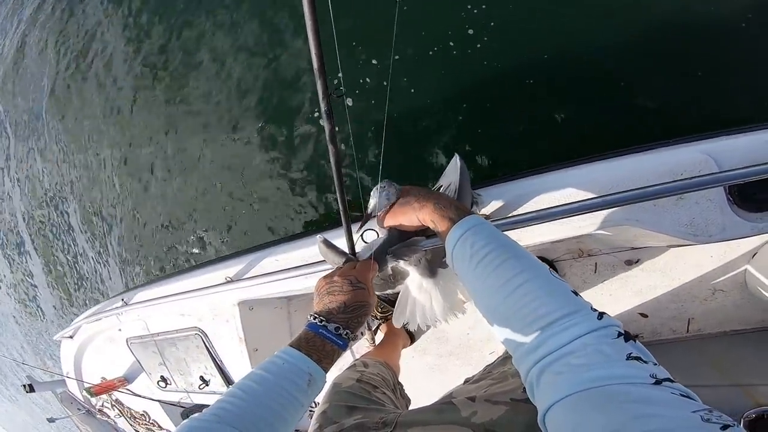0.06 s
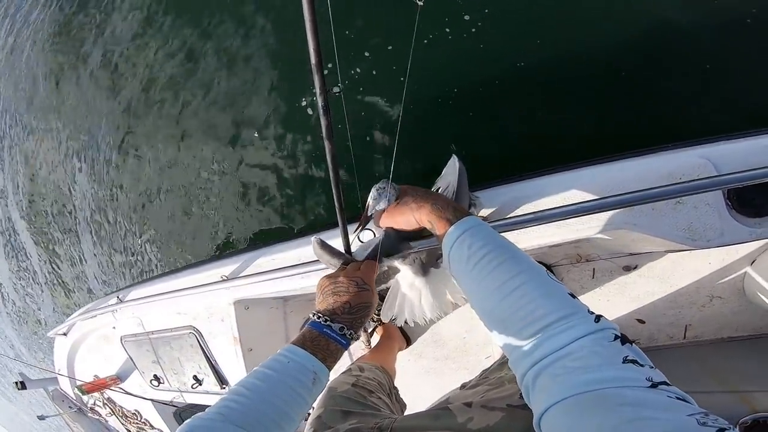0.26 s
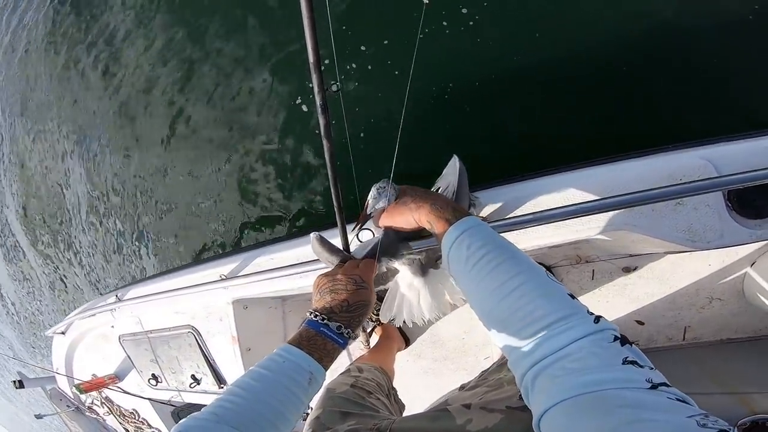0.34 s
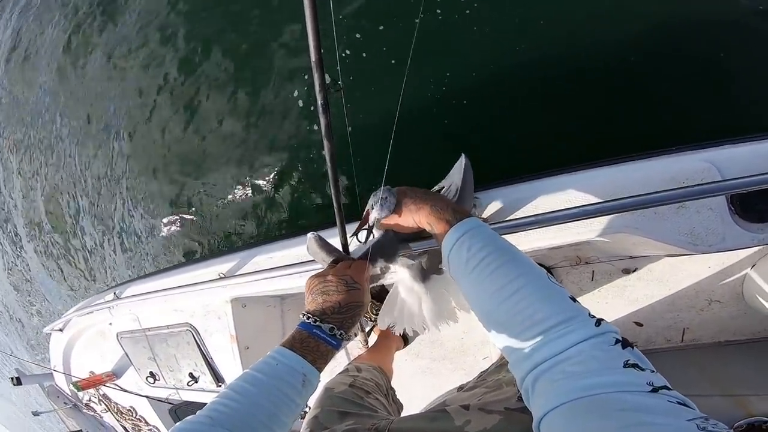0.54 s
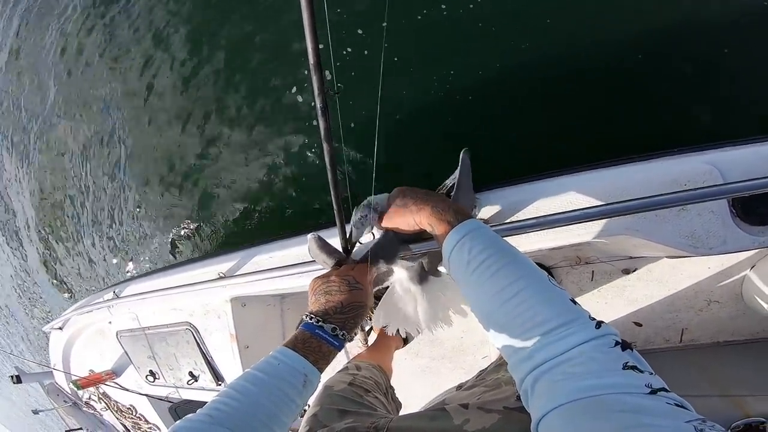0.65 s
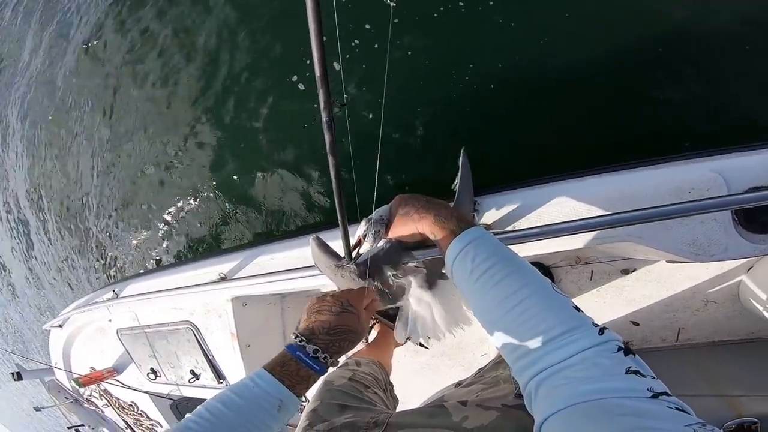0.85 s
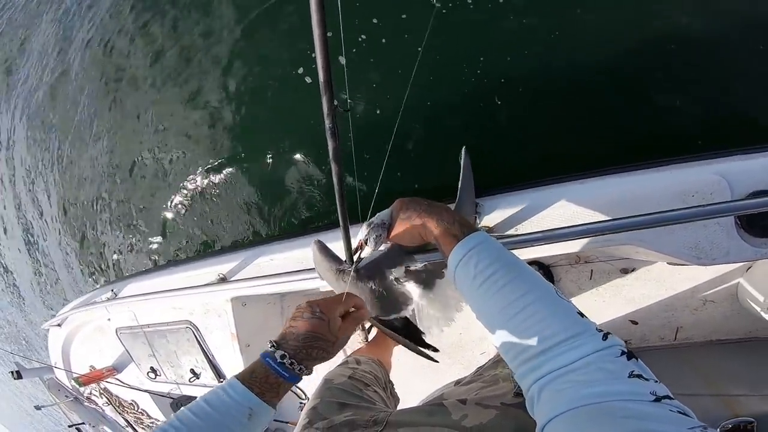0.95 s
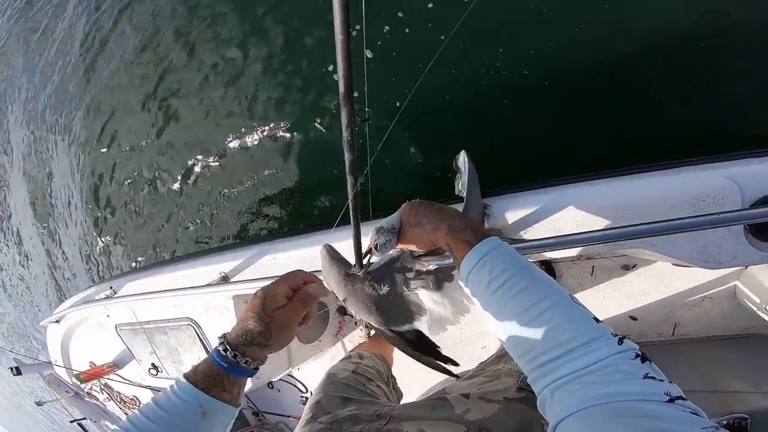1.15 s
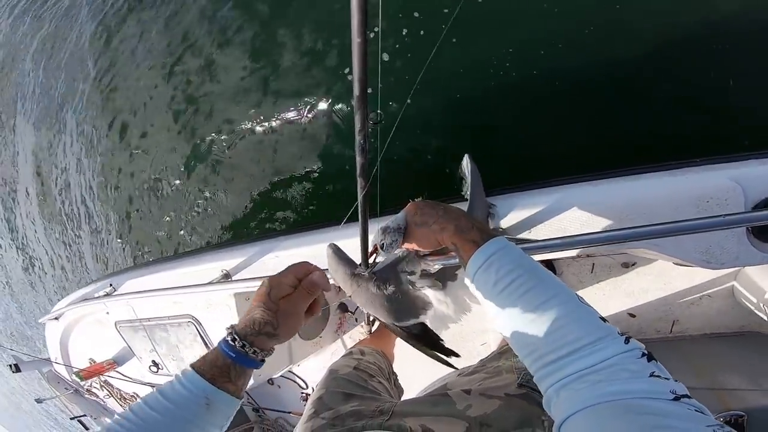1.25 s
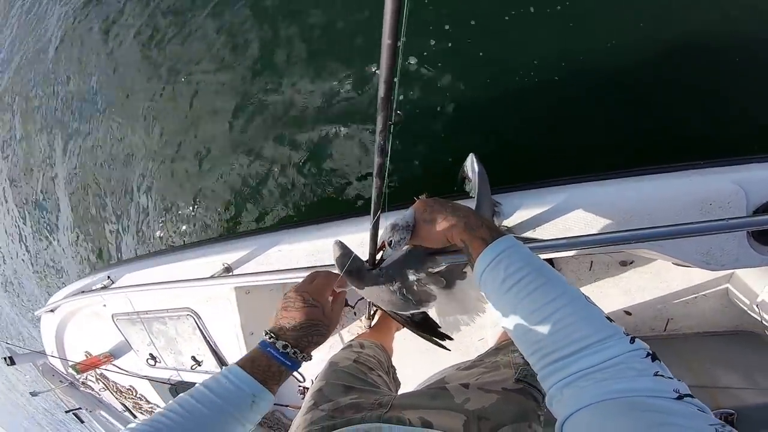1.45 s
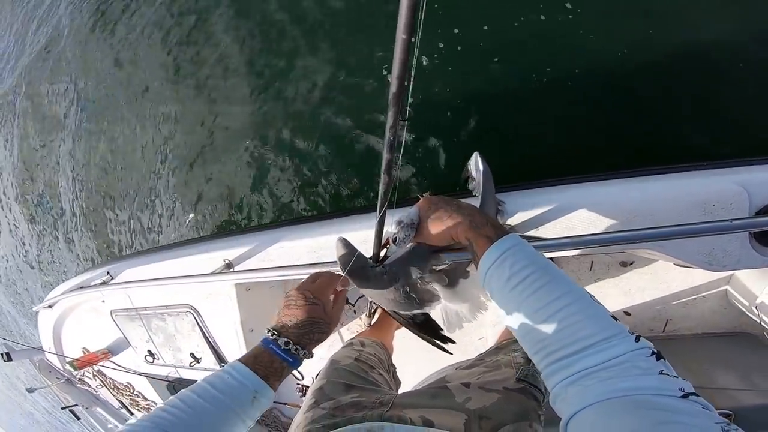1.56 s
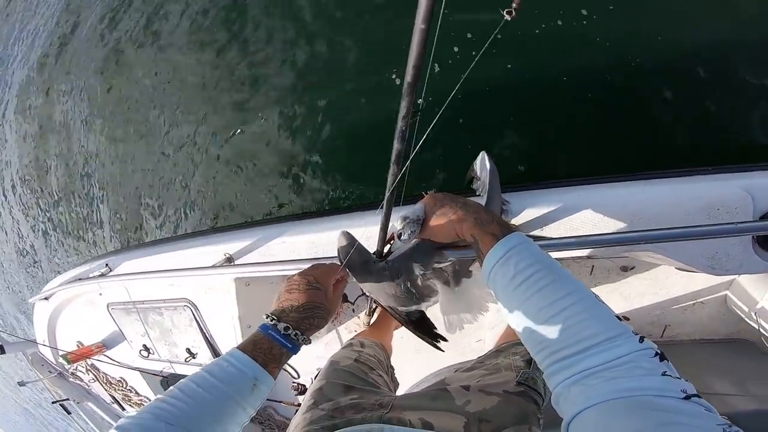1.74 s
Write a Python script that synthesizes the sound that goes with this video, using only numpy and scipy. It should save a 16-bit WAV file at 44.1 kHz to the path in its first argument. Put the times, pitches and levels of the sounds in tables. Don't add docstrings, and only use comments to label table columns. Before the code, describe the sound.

A held gull gives two loud, rough, high screams very close to the microphone, about half a second each, with dull hull thumps, small tackle clicks, faint low engine hum and thin water hiss outdoors.

```python
import sys
import numpy as np
from scipy import signal
from scipy.fft import rfft, irfft
from scipy.io import wavfile
from scipy.ndimage import uniform_filter1d

SR = 44100
rng = np.random.default_rng(int(sys.argv[2]) if len(sys.argv) > 2 else 0)


def dump_mix(stems):
    frames = np.atleast_2d(stems).T
    limited = np.clip(frames, -1, 1)
    pcm = np.round(limited * 32767).astype(np.int16)
    wavfile.write(sys.argv[1], SR, pcm)


def linear_from_db(decibels):
    return 10 ** (np.asarray(decibels, float) / 20)


N = 79380
TIME = np.arange(N) / SR

# frequency in Hz, density in dB per Hz.
HULL_RUMBLE = [(20, -21), (60, 1.5), (92, -2.5), (170, -8), (400, -26.5), (1500, -47.5)]
RUMBLE_DB = -54.5
HUM_HZ, HUM_DB, HUM_WANDER_HZ, HUM_FLICKER_DB = 90, -51, 2.7, -2.5
BASS_PAN_DB = -1

# frequency in Hz, density in dB per Hz.
SEA_SPECTRUM = [(200, -11), (355, -1), (800, -12.5), (1400, -10), (2700, -12), (8800, -21)]
# frequency in Hz, left-right likeness from 0 to 1.
PORT_LIKENESS = [(240, 0.94), (950, 0.67), (3800, 0.27)]
# time in seconds, hiss level in dB.
REDUCER_OPENING = [(0, -70), (.19, -62), (.65, -62.5), (.88, -67.5), (.92, -76.5), (.975, -76), (1.0, -64),
                   (1.55, -64), (1.66, -67), (1.71, -83), (1.8, -76.5)]
SEA_DB, SEA_TOP_HZ, SEA_PATCHY_DB = 9.5, 9670, 1.0

# start in seconds, peak in dB, centre in Hz, t60 in seconds.
TACKLE_TICKS = [(.017, -38, 3000, 0.074), (.143, -47, 3500, 0.019), (.155, -35, 2930, 0.082),
                (.779, -34.5, 4000, 0.067), (.788, -28.5, 2430, 0.029), (.7915, -27, 4130, 0.04),
                (1.727, -37.5, 1500, 0.055)]

# start in seconds, peak in dB, mode in Hz, t60 in seconds.
HULL_THUMPS = [(.1, -47, 132, .1), (0.258, -20.5, 90.7, 0.1), (0.289, -31, 198, 0.099),
               (0.298, -25.5, 65.7, 0.18), (.345, -33, 88.5, 0.15), (0.396, -26, 98.5, 0.15),
               (.46, -43, 72.3, 0.32), (0.522, -18.5, 66.3, 0.16), (0.598, -34, 54.2, 0.15),
               (0.759, -44, 286, 0.096), (0.763, -41, 441, 0.039), (.803, -46, 693, 0.12),
               (0.841, -49.5, 90, 0.057), (0.928, -54, 393, 0.067), (0.974, -51, 55, 0.46),
               (1.155, -35, 350, 0.064), (1.269, -29, 91.4, 0.15), (1.269, -45, 224, 0.1)]
THUMP_SWELL_CYCLES = 0.82

# time in seconds, pitch in Hz, level in dB, half-pitch lines in dB, # brightness in
# units of 2 dB per octave.
FIRST_CRY = [
    (.197, 477.6, -36.5, 7, -6.5),
    (.201, 496, -17.5, -18.5, -1.5),
    (.212, 914, -17.5, -27, -0.5),
    (.232, 1005, -13.5, -60, 4),
    (.3, 1049, -13.5, -35, 5.5),
    (.565, 988, -16.5, -45, 2.5),
    (.583, 826.7, -23.5, -19, -3),
    (.598, 783, -23.5, -11.5, 0),
    (.615, 539, -22.5, -17.5, -3.5),
]
SECOND_CRY = [
    (.982, 772, -20.5, -8.5, -6.5),
    (1.022, 931, -14.5, -17.5, -1.5),
    (1.065, 959, -16.5, -16.5, 0.5),
    (1.13, 973, -16.5, -25, 1.5),
    (1.26, 961.4, -16.5, -32.5, 3),
    (1.39, 921.4, -17.5, -53, -1.5),
    (1.442, 858, -20, -45, -4),
    (1.449, 558, -27, -26, -7),
    (1.462, 515, -23.5, -29, -4.5),
]
# time in seconds, pitch drop in Hz, level drop in dB, recovery in seconds,
# rise of half-pitch lines in dB.
VOICE_CATCHES = [(0.267, 21, 1, 0.01, -5), (0.324, 30, 2.5, 0.018, 6.5), (0.39, 38, 2, 0.013, 11),
                 (0.45, 50, 3.5, .03, 5), (.514, 68, 2.5, 0.02, 14), (.468, 0.8, -1.6, 0.0088, 11.5),
                 (0.528, 1, -0.2, 0.012, 13.5), (1.04, 3.3, 2, 0.017, 1), (1.113, 9.3, 2.5, 0.0048, 17),
                 (1.164, 21, 1, 0.0052, 11), (1.226, 18, 1, 0.019, -7), (1.284, 36, 2.5, 0.005, -3),
                 (1.344, 51, 2, 0.0058, -6), (1.401, 41, 2, 0.0074, 12.5)]
CATCH_FALL_S, CATCH_DULLS = 0.0058, 0.62
# frequency in Hz, gain in dB.
FIRST_THROAT = [(450, -19.5), (1020, -12.5), (2040, 0.5), (3060, 0), (4080, 0), (5100, -9), (6150, -25.5),
                (9200, -32.5)]
SECOND_THROAT = [(450, -16.5), (850, -20.5), (960, -8), (1550, 6), (2850, 1.5), (3800, -6), (4750, 1),
                 (8300, -20)]
# time in seconds, frequency in Hz, depth in dB.
BEAK_ANTIRESONANCE = [(.21, 8130, 7), (.6, 8370, 17.5), (1.0, 5610, 24.5), (1.06, 5850, 18.5),
                      (1.12, 7040, 14), (1.15, 8800, 14.5), (1.18, 6960, 13), (1.3, 5970, 5),
                      (1.44, 5150, 8)]
DIP_WIDTH_HZ = 540
# frequency in Hz, left-right in dB, left lead in radians.
FIRST_PORTS = [(1040, 3, 0.52), (1850, 12.5, -2.5), (1911, -2.6, -3.5), (2074, -3.5, -0.63),
               (3050, 2.1, 0.42), (4070, -3, 0), (4860, 0, 2.4), (5100, 0, 0.8)]
SECOND_PORTS = [(760, -11.5, -.6), (870, 15.5, -3), (942, 5.5, -1.05), (1820, -4, 1.48), (1996, 9.5, 2.32),
                (2740, -5, 0.18), (4730, 0.4, 0.44), (5800, -8, 1)]
# left-right at the start in dB, at the end in dB.
HEAD_TURN = [(-.2, -0.35), (2, -2.5)]
# delay in seconds, left in dB, right in dB.
HULL_REFLECTIONS = [(.0031, -21, -20.5), (.0074, -29.5, -26), (.013, -19.5, -30)]
STEADY_HZ = 850
SLACK_JITTER, STEADY_JITTER, SHIMMER, CATCH_SLACK = .045, .0003, .65, .04
BEAK_DB, HALF_FLICKER_DB, BREATHY_DB = 1.0, 6, -35
RELEASE_S = 0.0022
TOP_FALL_DB, TOP_FLOOR_DB = 105.5, -74
MIC_PEAK_HZ, MIC_PEAK_DB, MIC_PEAK_WIDTH_HZ = 14400, 18.5, 900

# time in seconds, pitch in Hz, level in dB.
FAR_CALLS = [
    (.7, 1372, -71),
    (.88, 1375, -90.5),
    (.93, 1377, -100),
    (1.5, 1346, -58),
    (1.64, 1353, -64.5),
    (1.7, 1306, -71.5),
]
# level in dB, from the fundamental up.
FAR_HARMONICS = [5.5, -3]

# start in seconds,
# peak in dB, mode in Hz, t60 in seconds.
DRIPS_AND_TICKS = [(1.652, -50, 1117, 0.072), (1.665, -40.5, 1216, 0.054), (1.716, -56.5, 1265, .05),
                   (1.762, -59, 1960, .08), (1.782, -53.5, 1270, .05), (1.705, -66, 3700, .03),
                   (1.749, -66, 3900, .03)]


def rms_one(x):
    return x / np.sqrt(np.mean(x ** 2) + 1e-20)


def in_time(rows):
    s, *columns = np.transpose(rows)
    return [np.interp(TIME, s, column) for column in columns]


def at_hz(points, hz, order=1):
    points = np.array(points)
    return np.interp(np.log(hz + 1), np.log(points[:, 0]), points[:, order])


def drift(rate):
    r = np.exp(-2 * np.pi * rate / SR)
    return rms_one(signal.lfilter([1], [1, -2 * r, r * r], rng.standard_normal(N + SR))[SR:])


def phase(hz):
    return 2 * np.pi * np.cumsum(hz) / SR


def panned(x, db):
    return np.array([x * linear_from_db(db / 2), x * linear_from_db(-db / 2)])


def banded_noise(spectrum, patchy_db):
    out, edges = 0, 20 * 2 ** np.arange(0, 9.6, .5)
    white = rng.standard_normal((2, 2, N))
    for k, (low, high) in enumerate(zip(edges, edges[1:])):
        band = signal.butter(2, [low, high], "band", fs=SR, output="sos")
        mid, side = signal.sosfilt(band, white[k % 2])
        hz = np.sqrt(low * high)
        alike = np.clip(at_hz(PORT_LIKENESS, hz), -1, 1)
        pair = np.sqrt(1 + alike) * mid + np.sqrt(1 - alike) * side * [[1], [-1]]
        out = out + linear_from_db(at_hz(spectrum, hz) + patchy_db * drift(10.0)) * pair
    return rms_one(out)


def damped_mode(s, db, hz, t60, swell_s, rise=0.):
    t = np.maximum(TIME - s, 0)
    decay = linear_from_db(db - 60 * np.maximum(t - swell_s, 0) / t60)
    swell = np.sin(np.pi / 2 * np.minimum(t / swell_s, 1))
    return decay * swell * np.sin(2 * np.pi * hz * t * (1 + rise * t / t60))


def engine():
    hz = HUM_HZ + HUM_WANDER_HZ * drift(11.7)
    tone = np.sin(phase(hz)) * linear_from_db(HUM_DB + 2 + HUM_FLICKER_DB * drift(9.1))
    rumble = banded_noise(HULL_RUMBLE + [(12000, -75)], patchy_db=2.0)
    return panned(tone, BASS_PAN_DB) + linear_from_db(RUMBLE_DB) * rumble


def sea():
    low_pass = signal.cheby1(7, 1, SEA_TOP_HZ, fs=SR, output="sos")
    hiss = signal.sosfilt(low_pass, banded_noise(SEA_SPECTRUM, SEA_PATCHY_DB))
    return linear_from_db(in_time(REDUCER_OPENING)[0] + SEA_DB) * hiss


def ticks():
    out, noise = np.zeros((2, N)), rng.standard_normal((2, N))
    noise[1] = 0.62 * noise[0] + 0.84 * noise[1]
    for s, db, hz, t60 in TACKLE_TICKS:
        burst = (TIME > s) * 0.57 * linear_from_db(-60 * np.maximum(TIME - s, 0) / t60) * noise
        burst[:, int(s * SR)] += 3.5
        resonance = signal.butter(2, [hz / 2.5, hz * 1.6], "band", fs=SR, output="sos")
        out += linear_from_db(db) * signal.sosfilt(resonance, burst + 1e-18)
    return signal.sosfilt(signal.butter(6, SEA_TOP_HZ, fs=SR, output="sos"), out)


def thumps():
    modes = [damped_mode(*row, swell_s=THUMP_SWELL_CYCLES / row[2]) for row in HULL_THUMPS]
    return panned(sum(modes), BASS_PAN_DB)


def catches():
    out = np.zeros((3, N))
    for s, hz, db, back_s, half_db in VOICE_CATCHES:
        width = np.where(TIME < s, CATCH_FALL_S, back_s)
        out += np.outer([hz, db, half_db], np.exp(-.5 * ((TIME - s) / width) ** 2))
    return out


def membranes(rows):
    pitch, _, half_db, bright = in_time(rows)
    drop_hz, drop_db, half_up_db = catches()
    half_db = half_db + half_up_db
    slack = np.clip((STEADY_HZ - pitch) / 200, 0, 1) + CATCH_SLACK * np.clip(half_db + 19, 0, 19)
    jitter = (STEADY_JITTER + SLACK_JITTER * slack) * drift(200)
    hz = (uniform_filter1d(pitch, size=350) - drop_hz) * (1 + jitter)
    turn = phase(hz)
    half = linear_from_db(np.minimum(half_db + HALF_FLICKER_DB * drift(35), 0))
    beak = linear_from_db(BEAK_DB * np.array([drift(9) for _ in range(7)]))
    tilt = bright - CATCH_DULLS * drop_db
    dip_hz, dip_db = in_time(BEAK_ANTIRESONANCE)
    source = 0
    for k in range(1, 40):
        dip = dip_db * np.exp(-((k * hz / 2 - dip_hz) / DIP_WIDTH_HZ) ** 2)
        level = linear_from_db(2 * tilt * np.clip(np.log2(k / 5), 0, 1.3) - dip)
        level = level * (half if k % 2 else beak[k % 7]) * (k * hz < 31000)
        source = source + level * np.cos(k * turn / 2)
    source *= 1 + SHIMMER * slack * drift(400)
    return source + linear_from_db(BREATHY_DB) * (1 + np.cos(turn)) * rng.standard_normal(N)


def throat_response(throat, f):
    bass_fall = 24 * np.log2(np.maximum(400 / (f + 1), 1))
    top_fall = TOP_FALL_DB * np.log2(np.maximum(f / throat[-1][0], 1))
    capsule = MIC_PEAK_DB * np.exp(-((f - MIC_PEAK_HZ) / MIC_PEAK_WIDTH_HZ) ** 2)
    gain_db = np.maximum(at_hz(throat, f) - bass_fall - top_fall, TOP_FLOOR_DB + capsule)
    cepstrum = irfft(np.log(linear_from_db(gain_db)), N)
    cepstrum[1:N // 2] *= 2
    cepstrum[N // 2 + 1:] = 0
    return np.exp(rfft(cepstrum))


def port_difference(ports, f):
    share = np.minimum(f / ports[0][0], 1)
    split = linear_from_db(at_hz(ports, f) / 2 * share) * np.exp(.5j * at_hz(ports, f, order=2) * share)
    return uniform_filter1d(split.real, size=80) + 1j * uniform_filter1d(split.imag, size=80)


def hull_echoes(pair):
    out = pair.copy()
    for s, *side_db in HULL_REFLECTIONS:
        delay = int(s * SR)
        out[:, delay:] += linear_from_db(np.array(side_db))[:, None] * pair[::-1, :N - delay]
    return out


def cry(rows, throat, ports, turn_db):
    start, end = rows[0][0], rows[-1][0]
    f = np.arange(N // 2 + 1) * SR / N
    source, body = membranes(rows), throat_response(throat, f)
    voice = irfft(rfft(source) * body, N)
    even = np.sqrt(uniform_filter1d(voice ** 2, size=300))
    gate = (TIME > start) * np.exp(-np.maximum(TIME - end, 0) / RELEASE_S)
    level = linear_from_db(in_time(rows)[1] - catches()[1])
    voice = rfft(source / even * gate * level) * body
    split = port_difference(ports, f)
    pair = np.array([irfft(voice * split, N), irfft(voice / split, N)])
    pair *= panned(0.87, np.interp(TIME, [rows[2][0], end], turn_db))
    pair *= np.clip((TIME - start) / .0008, 0, 1)
    return hull_echoes(pair)


def far_gull():
    hz, db = in_time(FAR_CALLS)
    turn = phase(hz * (1 + .02 * drift(40)))
    ports = []
    for _ in "LR":
        harmonics = [linear_from_db(d) * drift(130) * np.sin((k + 1) * turn) for k, d in enumerate(FAR_HARMONICS)]
        ports.append(sum(harmonics))
    return linear_from_db(db) * np.array(ports)


def drips():
    return panned(sum(damped_mode(*row, swell_s=0.0021, rise=0.099) for row in DRIPS_AND_TICKS), -2.0)


def scene():
    gull = cry(FIRST_CRY, FIRST_THROAT, FIRST_PORTS, HEAD_TURN[0])
    gull = gull + cry(SECOND_CRY, SECOND_THROAT, SECOND_PORTS, HEAD_TURN[1])
    return engine() + sea() + ticks() + thumps() + gull + far_gull() + drips()


def top_cut(x):
    return signal.sosfilt(signal.butter(12, 15880, fs=SR, output="sos"), x)


def record(dry):
    return top_cut(dry)


dry = scene()
out = record(dry)
dump_mix(out)
```